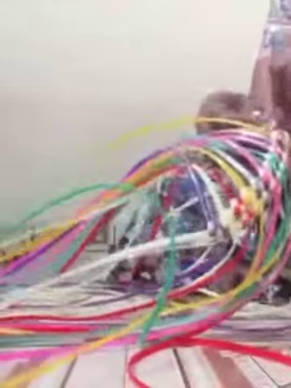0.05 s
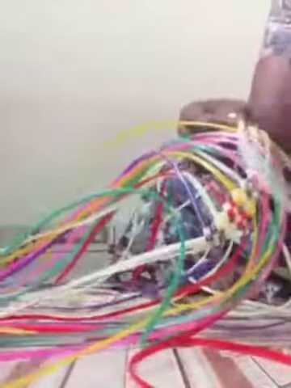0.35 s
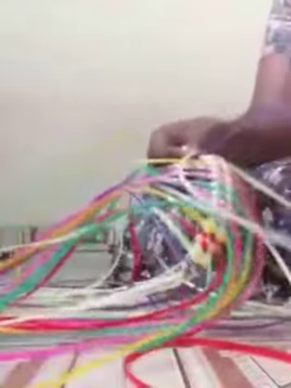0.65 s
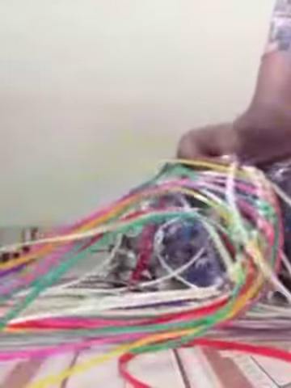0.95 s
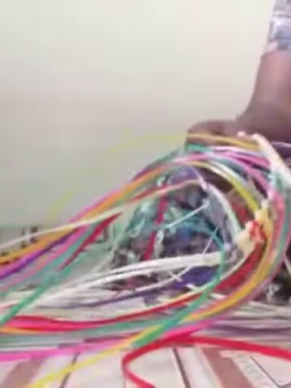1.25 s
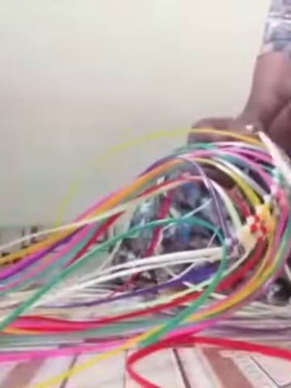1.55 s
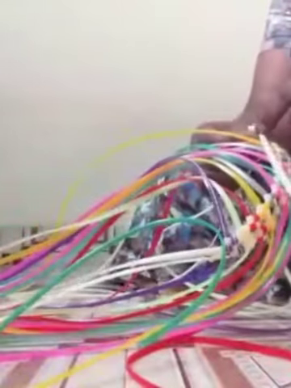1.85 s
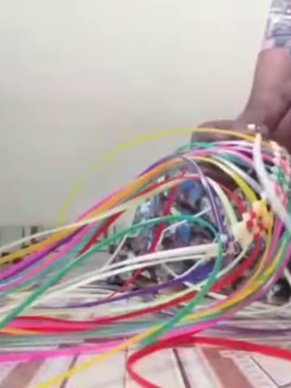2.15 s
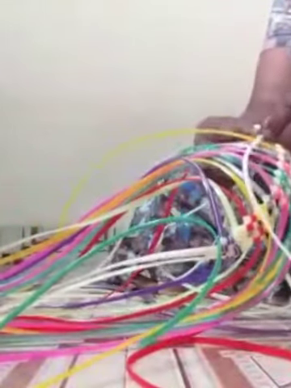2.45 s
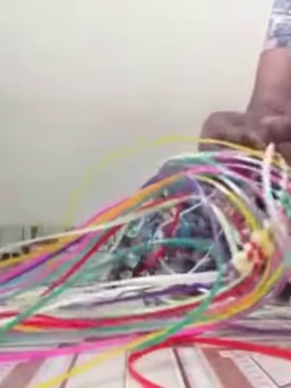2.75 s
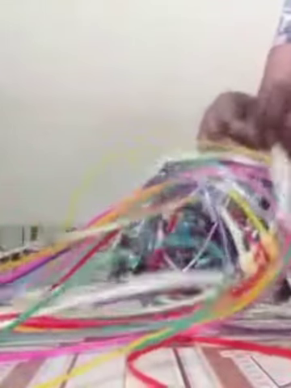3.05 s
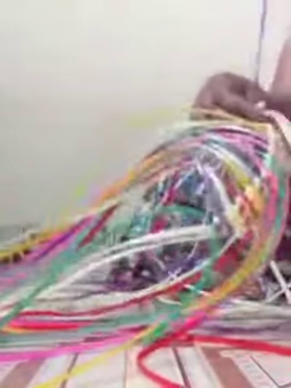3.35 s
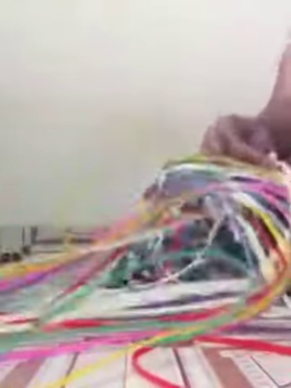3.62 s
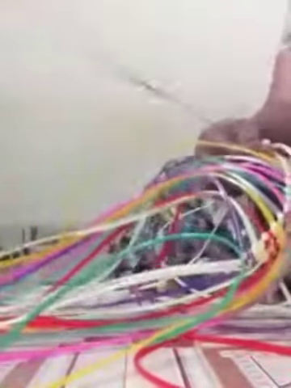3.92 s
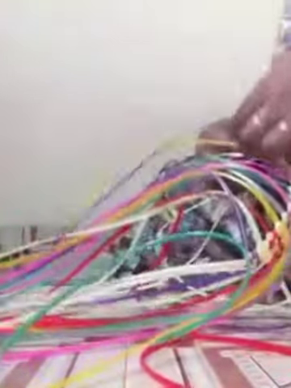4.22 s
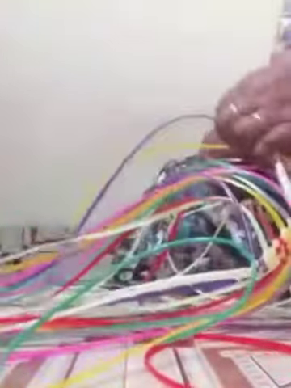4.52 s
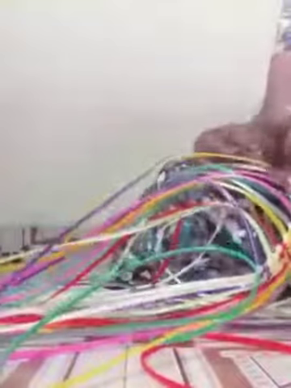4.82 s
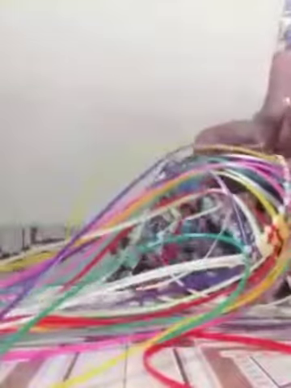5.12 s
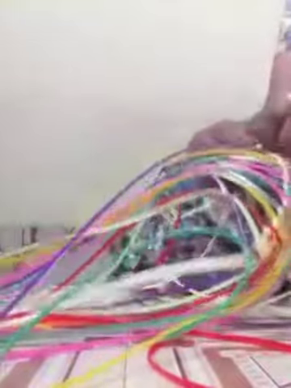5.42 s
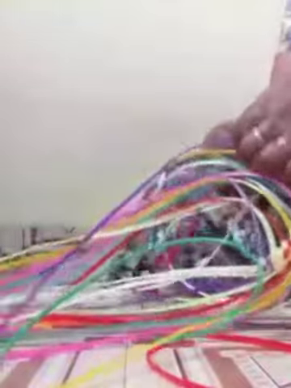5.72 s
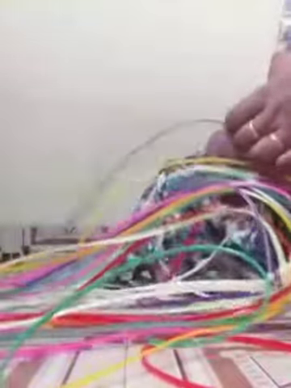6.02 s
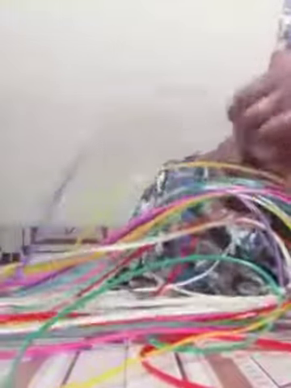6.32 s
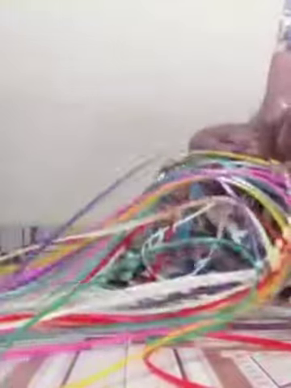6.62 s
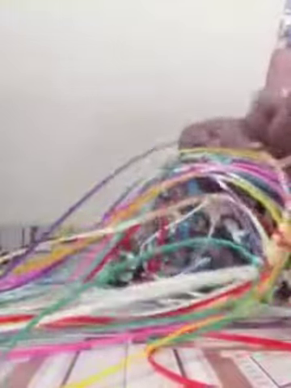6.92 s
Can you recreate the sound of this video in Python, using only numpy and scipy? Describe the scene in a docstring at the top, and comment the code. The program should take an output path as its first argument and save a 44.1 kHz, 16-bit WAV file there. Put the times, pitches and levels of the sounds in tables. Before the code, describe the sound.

Close by, plastic strands are pulled through a basket in a bare, echoing room, making soft rustling swishes, sharp ticks and a few tiny high squeaks. Outside, a harsh bird, probably a crow, caws twice. Past the middle, clicks and a hollow bump lead to one hard snap of a taut strand. The bird caws twice more near the end. Faint distant birds and a low, fan-like hum lie behind.

```python
"""Weaving a plastic basket

Plastic strands rustle, squeak and tick as they slide and catch in a bare, echoing room; once, a taut
strand lets go with a hard snap. Outside, a harsh bird, probably a crow, caws four times as rough pulses
ring in its throat, and fainter birds call farther off. A low hum, like that of a fan, fills the room.
Two microphone ports, close together, make the left and right channels."""
import sys
import numpy as np
from scipy import signal
from scipy.fft import rfft, irfft, next_fast_len
from scipy.io import wavfile
from scipy.ndimage import map_coordinates

SR = 44100
rng = np.random.default_rng(int(sys.argv[2]) if len(sys.argv) > 2 else 0)


def to_wav(s):
    """Save 16-bit WAV."""
    ch = np.atleast_2d(s).T  # columns
    pcm = np.round(np.clip(ch, -1, 1) * 32767)  # PCM
    wavfile.write(sys.argv[1], SR, pcm.astype(np.int16))


N = 307377

# Levels in the tables are relative. A "colour" says how strong each frequency is,
# "decay" is the time to fade by 60 dB, and "pan" is left level minus right level.
# How alike the two ports hear sound that comes from all around: f/Hz, correlation
PORT_LIKENESS = [(100, 0.77), (180, 0.83), (330, 0.58), (600, -0.1), (1200, 0.064), (3000, -0.052),
                 (10000, -0.15)]
# Echo of the room: f/Hz, decay/s
ROOM_DECAY = [(200, 1), (1000, 0.76), (4000, 0.65), (9000, 0.56), (15000, 0.39)]
# Echo of the walls between the birds and the room: f/Hz, decay/s
YARD_DECAY = [(500, 0.89), (1900, 0.9), (4500, 0.7), (10000, 0.52)]
# Tones of the hum: f/Hz, level/dB
HUM_TONES = [(69.3, -66), (110, -68.5), (138, -65), (155, -68.5), (200.5, -69), (312, -77), (394, -78.5),
             (517, -81)]
# Colour of the room's rumble and hiss: f/Hz, level/dB
AIR_COLOUR = [(25, -38), (42, -19.5), (62, -2.5), (90, -2), (140, -3), (220, -5), (310, -8), (400, -14),
              (600, -15.5), (1000, -27.5), (2200, -35), (4900, -37), (9000, -40.5), (16000, -41)]
# Standing waves in the room favour one port: f/Hz, pan/dB
ROOM_PAN = [(70, 1), (140, -1), (260, -2), (500, -8), (1000, -1)]
# Shape of the slow swelling of the deepest rumble: t/s, level/dB
RUMBLE_SWELL = [(0.1, -68.5), (0.85, -71), (1.73, -62.5), (2.56, -67), (3.31, -63.5), (3.58, -67),
                (5.1, -61), (5.7, -68.5), (6.6, -65.5), (6.85, -67)]
# Calls of birds farther off: t/s, length/s, f/Hz, tremble as a share of the pitch, level/dB
FAR_BIRDS = [(1.18, 0.06, 1113, 0.12, -62.5), (1.219, 0.12, 2760, 0.065, -71.5),
             (1.215, 0.12, 4290, 0.051, -68), (1.891, 0.079, 3280, 0.12, -69.5),
             (2.246, 0.1, 1012, 0.03, -69), (3.384, 0.21, 1402, 0.036, -68.5),
             (3.599, 0.074, 2560, 0.09, -72), (4.744, 0.15, 1717, 0.13, -71.5),
             (4.863, 0.13, 1448, 0.11, -69.5), (5.295, 0.16, 3170, 0.088, -70),
             (5.321, 0.36, 1536, 0.15, -67.5), (5.976, 0.11, 1309, 0.17, -59.5)]
# Caws of the near bird: t/s, length/s, level/dB, f/Hz, throat tuning factor, jitter as a share of pitch
NEAR_CAWS = [(0.522, 0.36, -45, 472.6, 1.006, 0.07), (1.557, 0.35, -46.5, 467.8, 0.99, 0.08),
             (5.485, 0.36, -45, 481.1, 1.008, .065), (6.399, 0.35, -46, 481.8, 0.996, 0.06)]
# Resonances of its throat: f/Hz, level/dB
THROAT_COLOUR = [(500, -37.5), (750, -10.5), (950, -14.5), (1100, -13.5), (1450, -18), (1700, -3),
                 (1900, 0.5), (2040, -4.5), (2230, -23), (3300, -46), (4150, -23), (4520, -13.5),
                 (5300, -18.5), (5800, -26.5), (8000, -30), (10500, -43)]
# Colour of plastic slipping on plastic: f/Hz, level/dB
PLASTIC_COLOUR = [(500, -38), (900, -26.5), (1300, -14.5), (1850, -9.5), (2500, -11), (3600, -5),
                  (6200, -5.5), (8700, -0.5), (10800, -6.5), (14500, -5), (16000, -17.5)]
# Duller colour of the whole bundle of strands: f/Hz, level/dB
BUNDLE_COLOUR = [(200, -20), (600, -4), (1400, -2.5), (4000, -4.5), (8000, -9), (14000, -21.5)]
# Colour of the basket's hollow knock: f/Hz, level/dB
BASKET_COLOUR = [(40, -48), (100, -29), (220, -12.5), (380, -3.5), (560, -5), (900, -11), (1500, -13.5),
                 (2500, -22), (6000, -49.5)]
# A strand is pulled through the weave: t/s of top speed, speeding up/s, slowing down/s, level/dB
STRAND_PULLS = [(.1, .09, 0.47, -58), (.6, .24, 0.19, -44.5), (1.11, 0.47, 0.29, -61.5),
                (1.28, 0.2, 0.053, -62), (2.47, .11, 0.25, -59.5), (2.679, .2, 0.19, -65.5),
                (3.06, 0.35, .25, -55), (3.249, 0.12, .06, -44.5), (3.43, 0.16, 0.26, -55),
                (4.76, .36, 0.193, -61), (5.27, .55, 0.66, -69.5), (6.05, .1, 0.18, -61),
                (6.42, 0.2, .16, -58), (6.97, .12, .1, -50.5)]
# The hands shift the bundle: t/s of top speed, speeding up/s, slowing down/s, level/dB
BUNDLE_SHIFTS = [(.13, 0.18, .9, -58), (2.44, 0.036, 0.19, -62), (3.01, 0.26, .2, -60),
                 (3.63, 0.29, 0.18, -67), (3.99, 0.011, .06, -47.5), (6.37, 0.052, 0.29, -55.5)]
# A strand squeaks as it is pulled tight: t/s, length/s, f/Hz, tremble as a share of the pitch, level/dB
SQUEAKS = [(0.648, 0.043, 8260, 0.075, -46.5), (2.429, 0.027, 8800, 0.143, -40.5),
           (3.054, 0.016, 1863, 0.24, -49.5), (3.293, 0.024, 8680, 0.06, -43)]
# The hand jolts the basket: t/s, level/dB, pan/dB
HAND_BUMPS = [(.278, -33, -5), (.312, -42.5, -20), (.36, -49, -11), (4.001, -42, 3.5), (4.009, -39, -1),
              (6.03, -45, 0)]
# Clear flicks of strand against strand: t/s, level/dB, decay/s, brightness/(dB per octave), pan/dB
FLICKS = [(0.09, -43.5, 0.0039, -1.5, -15), (.125, -46.5, 0.021, -5, -23), (.264, -41, 0.01, -3, -20),
          (.274, -38.5, 0.0031, -3.5, -15), (.278, -30.5, 0.0026, -8.5, -14), (0.3095, -35.5, .008, 2, -21),
          (0.3595, -42.5, 0.0035, -4.5, -26), (.382, -38, 0.0072, -8, -4), (.577, -36.5, 0.0021, -8, -9),
          (0.6121, -25, 0.0099, 2, -17.5), (.704, -28.5, 0.01, -1, -18.5), (1.008, -48, 0.0057, 3.5, -15.5),
          (1.1607, -44, 0.0027, 7, 0), (2.432, -29, 0.0026, 3.5, 5), (2.652, -44.5, 0.0034, 7.5, 13),
          (2.905, -36.5, 0.0035, 0, 2), (3.063, -31.5, 0.029, -2.5, -3), (3.088, -33.5, 0.0062, 4.5, -4.5),
          (3.226, -39, 0.02, 2.5, 5), (3.299, -33.5, 0.0016, 2, 1), (3.9804, -32.5, 0.0035, 0, 16),
          (3.983, -29, 0.021, 1.5, 1.5), (3.9997, -32, 0.0033, 0.5, 4.5), (4.0071, -30, 0.0027, -1, 24.5),
          (4.0088, -33.5, .002, 4, 18), (4.2542, -34.5, 0.0024, -5.5, 12.5),
          (4.739, -46.5, 0.0022, -9, 4.5), (5.845, -47.5, .003, -9, 0), (6.1865, -52.5, .005, 7, 7),
          (6.333, -48.5, .0015, -7, 2), (6.352, -38, 0.003, 2, 13), (6.3938, -39, 0.0017, -1.5, -15),
          (6.8878, -44, 0.0031, -7, -16), (6.943, -48, .0053, -8, 8)]
# Ringing tones of the snapping strand: f/Hz, level/dB, decay/s
SNAP_TONES = [(4480, 5, .0017), (9400, -3.5, 0.0018), (12730, -8, 0.0021), (5430, -22.5, 0.0049)]
# Colour of what the snap sends into the room: f/Hz, level/dB
SNAP_ECHO_COLOUR = [(700, -33), (1300, -22.5), (2200, -9.5), (4500, 0.5), (6200, -2.5), (9500, -0.5),
                    (12000, -3), (16000, -8)]


def amp(db):
    """Turn decibels into a factor to multiply by."""
    return 10 ** (np.asarray(db) / 20)


def unit(x):
    """Scale a sound to an average (rms) level of 1."""
    return x / np.sqrt(np.mean(x ** 2) + 1e-20)


def unit_burst(x):
    """Give a burst the energy of one millisecond of sound at level 1."""
    return x * np.sqrt(SR / 1000 / np.sum(x ** 2))


def look_up(table, hz):
    """Read between the rows of a (frequency, value) table, on a log frequency scale."""
    freqs, values = np.transpose(table)
    return np.interp(np.log(hz + 1), np.log(freqs + 1), values)


def wobble(rate, size=N):
    """A smooth curve through `rate` random values a second."""
    return map_coordinates(rng.standard_normal(size // 20 + 4), [np.arange(size) * rate / SR])


def filtered(x, response):
    """Multiply each frequency of a sound by response(hz)."""
    n = x.shape[-1]
    padded = next_fast_len(n + 4096)
    hz = np.fft.rfftfreq(padded, 1 / SR)
    return irfft(rfft(x, padded) * response(hz), padded)[..., :n]


def colour_burst(x, colour_db):
    """Colour a short sound with no ringing ahead of it (a minimum-phase filter)."""
    n = len(x)
    gain = amp(colour_db(np.fft.rfftfreq(n, 1 / SR)))
    cepstrum = irfft(np.log(gain + 1e-6))
    fold = np.r_[1, np.full(n // 2 - 1, 2), np.zeros(n // 2)]  # moves early ringing after the start
    return irfft(rfft(x) * np.exp(rfft(cepstrum * fold)))


def add(track, start, sound):
    """Mix a sound into a track, `start` seconds in."""
    part = track[..., max(round(start * SR), 0):][..., :sound.shape[-1]]
    part += sound[..., :part.shape[-1]]


def left_first(x, lead_s):
    """Sound reaches the left port lead_s before the right one; negative means after."""
    return filtered(x, lambda hz: np.exp(1j * np.pi * hz * np.array([[lead_s], [-lead_s]])))


def surrounding_noise(size):
    """Noise from all around: alike at the two ports only in the bass."""
    def shares(hz):
        angle = np.arccos(np.clip(look_up(PORT_LIKENESS, hz), -1, 1)) / 2
        return np.array([np.cos(angle), np.sin(angle)])
    common, opposite = filtered(rng.standard_normal((2, size)), shares)
    return np.array([common + opposite, common - opposite])


def echo_pattern(decay):
    """How the walls answer a click: each frequency dies away at its own speed."""
    hz, t, spectrum = signal.stft(surrounding_noise(SR), SR, nperseg=256)
    fade = amp(-60 * t / look_up(decay, hz)[:, None])
    echo = signal.istft(spectrum * fade, SR, nperseg=256)[1]
    return echo / np.linalg.norm(echo[0])


def echo_of(x, pattern):
    """The left and right echo of a one-channel sound."""
    return signal.fftconvolve(x[None], pattern, axes=1)


def changing_echoes(x, decay, count=5):
    """Each stretch of a long sound echoes differently, as the paths change when a source moves."""
    out = np.zeros((2, N))
    edges = np.linspace(0, N, count + 1).astype(int)
    for first, last in zip(edges, edges[1:]):
        add(out, first / SR, echo_of(x[first:last], echo_pattern(decay)))
    return out


def room_hum(air_db=-58, deep_hz=100):
    """Slightly unsteady low tones over rumble and hiss; the deepest part swells and sinks."""
    t = np.arange(N) / SR
    tones = np.zeros(N)
    for hz, db in HUM_TONES:
        loudness = amp(db + 4 * wobble(3.3))
        tones += loudness * unit(np.sin(2 * np.pi * hz * t + 1.4 * wobble(11)))
    air = unit(filtered(surrounding_noise(N), lambda hz: amp(look_up(AIR_COLOUR, hz))))
    room = tones + amp(air_db) * air
    room = filtered(room, lambda hz: amp(look_up(ROOM_PAN, hz) * np.array([[0.5], [-0.5]])))
    deep = filtered(room, lambda hz: 1 / (1 + (hz / deep_hz) ** 4))
    swelling = np.interp(t, *np.transpose(RUMBLE_SWELL))
    deep_db = 0.9 * (swelling - swelling.mean()) - 0.5
    return room - deep + amp(deep_db) * deep


def swell(length, rise, fall):
    """A smooth fade in and out; rise and fall are shares of the length."""
    progress = np.linspace(0, 1, round(length * SR))
    ramp = np.minimum(progress / rise, (1 - progress) / fall)
    return np.sin(np.pi / 2 * np.clip(ramp, 0, 1)) ** 2


def whistle(length, hz, tremble):
    """A short tone with a trembling pitch: a far bird or a squeaking strand."""
    shape = swell(length, rise=0.23, fall=0.42)
    pitch = hz * (1 + tremble * wobble(900, SR)[:len(shape)])
    return shape * unit(np.sin(2 * np.pi * np.cumsum(pitch) / SR))


def caw(length, pitch_hz, tuning, jitter, rasp=0.63, throb_hz=32, throb_db=3, scoop=0.11, opening_s=0.04):
    """Unsteady pulses and puffs of air ring in the bird's throat, and the whole call throbs."""
    body_shape = swell(length, rise=0.284, fall=0.27)
    shrill_shape = swell(length, rise=0.18, fall=0.48)  # speaks first and fades first
    n = len(body_shape)
    t = np.arange(n) / SR
    cycles = np.cumsum(pitch_hz * (1 + jitter * wobble(400, SR)[:n])) / SR
    pulses = np.diff(np.floor(cycles), prepend=0)  # one in each cycle
    puffs = rng.standard_normal(SR)[:n] * (1 + np.cos(2 * np.pi * cycles))
    buzz = unit(pulses - pulses.mean()) + rasp * unit(puffs)
    voice = unit(filtered(buzz, lambda hz: amp(look_up(THROAT_COLOUR, hz / tuning)) * (hz > 300)))
    shrill = filtered(voice, lambda hz: (hz > 3200) & (hz < 5700))
    speed = 1 - scoop * np.exp(-t / opening_s)  # the body slides up in pitch as the beak opens
    body = map_coordinates(voice - shrill, [np.cumsum(speed)])
    throb = unit(amp(throb_db * np.sin(2 * np.pi * throb_hz * t)))
    return throb * (body_shape * body + shrill_shape * shrill)


def birds():
    """Calls from outside arrive mostly by bouncing off walls."""
    calls = np.zeros(N)
    for start, length, db, pitch_hz, tuning, jitter in NEAR_CAWS:
        add(calls, start, amp(db) * caw(length, pitch_hz, tuning, jitter))
    for start, length, hz, tremble, db in FAR_BIRDS:
        add(calls, start, amp(db) * whistle(length, hz, tremble))
    direct = left_first(calls, lead_s=-0.00058)  # the right port hears them first
    return amp(-9) * direct + amp([[0], [-1]]) * changing_echoes(calls, YARD_DECAY)


def friction_db(moves, t, range_db=20.5):
    """Level of sliding: each move gains range_db while speeding up and loses it while slowing down."""
    levels = [db - range_db * np.maximum((peak - t) / rise, (t - peak) / fall)
              for peak, rise, fall, db in moves]
    return np.max(levels, axis=0)


def rustle(clump_db=3, grains_per_s=2500):
    """Sliding strands catch and slip in tiny grains over a smooth hiss, and squeak when pulled tight."""
    out = np.zeros(N)
    for moves, colour in (STRAND_PULLS, PLASTIC_COLOUR), (BUNDLE_SHIFTS, BUNDLE_COLOUR):
        catches = rng.random(N) < grains_per_s / SR
        grains = catches * rng.standard_normal(N)
        grains *= amp(clump_db * np.minimum(rng.exponential(size=N), 2))  # some stand out
        hiss = 0.78 * rng.standard_normal(N)
        friction = unit(filtered(unit(grains) + hiss, lambda hz: amp(look_up(colour, hz))))
        level_db = friction_db(moves, np.arange(N) / SR) - 3.5
        flutter_db = 2 * wobble(53) + 1.2 * wobble(300)
        out += friction * amp(level_db + flutter_db)
    for start, length, hz, tremble, db in SQUEAKS:
        add(out, start, amp(db) * whistle(length, hz, tremble))
    return amp([[-6], [-4]]) * out + changing_echoes(out, ROOM_DECAY)


def basket_knock(push):
    """The hollow answer of the basket to a push."""
    return unit_burst(colour_burst(push, lambda hz: look_up(BASKET_COLOUR, hz)))


def plastic_click(slips, brightness):
    """The click of slipping plastic, tilted towards the treble by `brightness` dB per octave."""
    colour_db = lambda hz: look_up(PLASTIC_COLOUR, hz) + brightness * np.log2(hz / 6000 + 0.032)
    return unit_burst(colour_burst(slips, colour_db))


def stray_flicks(chances=36, moving_db=-70, faint_db=-56, decay_s=0.0036):
    """Loose strands flick by chance during a pull, louder on a harder one; rows as in FLICKS."""
    times = (np.arange(chances) + rng.random(chances)) / chances * N / SR
    efforts_db = friction_db(STRAND_PULLS, times) - moving_db
    scatter = rng.standard_normal((chances, 3)) * [3, 5, 9]
    return [(start, faint_db + 0.45 * effort_db + extra_db, decay_s, brightness, pan_db)
            for start, effort_db, (extra_db, brightness, pan_db) in zip(times, efforts_db, scatter)
            if effort_db > 0]


def ticks_and_bumps(size=2048, echo_count=7, push_decay_s=0.022):
    """A flick is a tiny burst of slips in the plastic plus a basket knock; a bump is the knock alone."""
    out = np.zeros((2, N))
    t = np.arange(size) / SR
    tap = signal.unit_impulse(size)  # feeds the echo: all directions together have an even spectrum
    patterns = [echo_pattern(ROOM_DECAY) for _ in range(echo_count)]  # neighbours echo differently
    push = lambda: rng.standard_normal(size) * amp(-60 * t / push_decay_s)
    port_gains = lambda db, pan_db: amp(-5.5) * amp([[db + pan_db / 2], [db - pan_db / 2]])
    for k, (start, db, pan_db) in enumerate(HAND_BUMPS):
        add(out, start, port_gains(db, pan_db) * basket_knock(push()))
        add(out, start, echo_of(amp(db + 0.4) * basket_knock(tap), patterns[k % echo_count]))
    for k, (start, db, decay, brightness, pan_db) in enumerate(FLICKS + stray_flicks()):
        knock_share = amp(-15.5 - 0.86 * brightness)  # a duller contact knocks more
        slips = rng.standard_normal(size) * t * amp(-60 * t / decay)  # builds up, then dies
        direct = plastic_click(slips, brightness) + knock_share * basket_knock(push())
        add(out, start, port_gains(db, pan_db) * direct)
        into_room = plastic_click(tap, brightness) + knock_share * basket_knock(tap)
        add(out, start + decay / 4, echo_of(amp(db + 0.54) * into_room, patterns[k % echo_count]))
    return out


def snap(start_s=4.2571, size=2048):
    """A taut strand lets go and whips the weave: a very short ring and a crack, then the room's echo."""
    out = np.zeros((2, N))
    t = np.arange(size) / SR
    ring = sum(amp(db - 60 * t / decay) * np.sin(2 * np.pi * hz * t) for hz, db, decay in SNAP_TONES)
    attack = (1 - np.exp(-t / 0.00032)) ** 2
    # The weave scatters the crack, so each port gets its own noise.
    crack = amp(-16.5 - 60 * t / 0.0099) * rng.standard_normal((2, size))
    treble_band = lambda hz: (1 - 1 / (1 + (hz / 3500) ** 4)) / (1 + (hz / 15000) ** 8)
    add(out, start_s, amp(6.5) * ring * attack + filtered(crack, treble_band))
    out = left_first(out, lead_s=0.000025)  # the left port is a little nearer
    into_room = colour_burst(signal.unit_impulse(size), lambda hz: look_up(SNAP_ECHO_COLOUR, hz))
    add(out, start_s + 0.0017, echo_of(amp(-22) * unit_burst(into_room), echo_pattern(ROOM_DECAY)))
    return out


def scene():
    """Weaving close by, birds outside and the hum of the room."""
    return ticks_and_bumps() + snap() + rustle() + birds() + room_hum()


def record(dry):
    """Cut away the highest treble, from 16200 Hz up."""
    return filtered(dry, lambda hz: hz < 16200)


dry = scene()
out = record(dry)
to_wav(out)
```